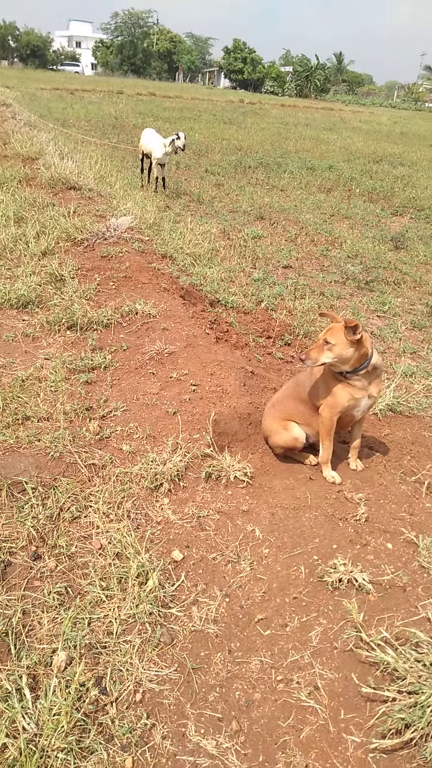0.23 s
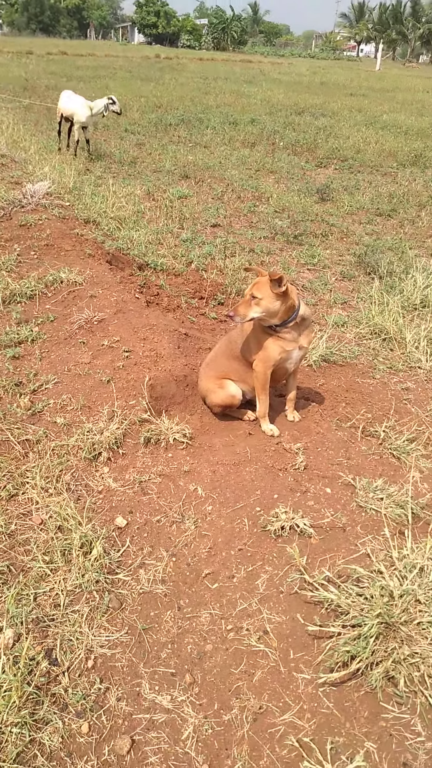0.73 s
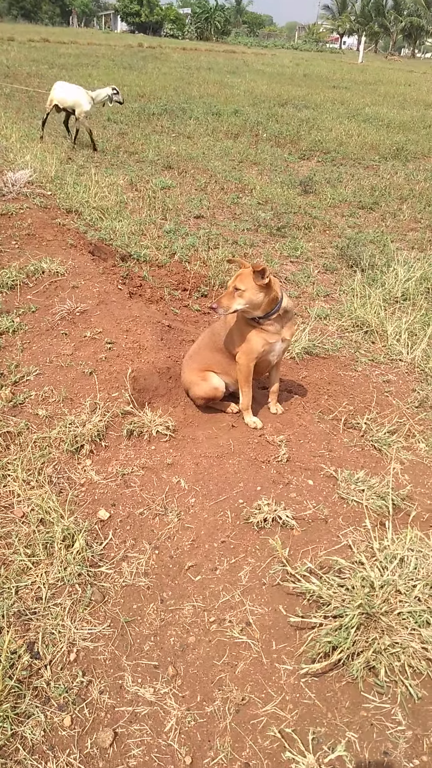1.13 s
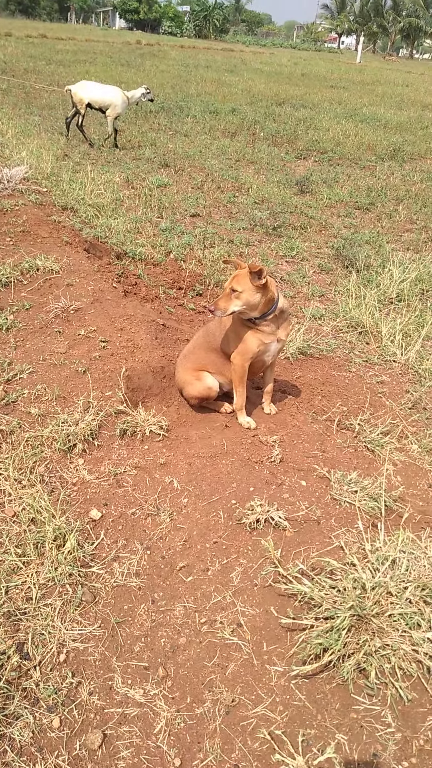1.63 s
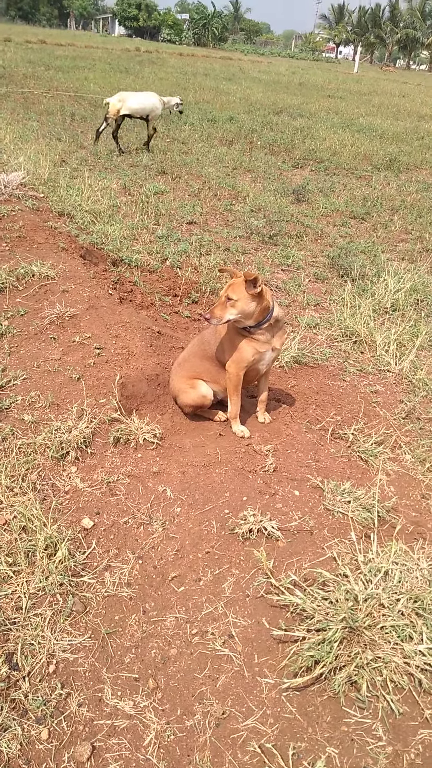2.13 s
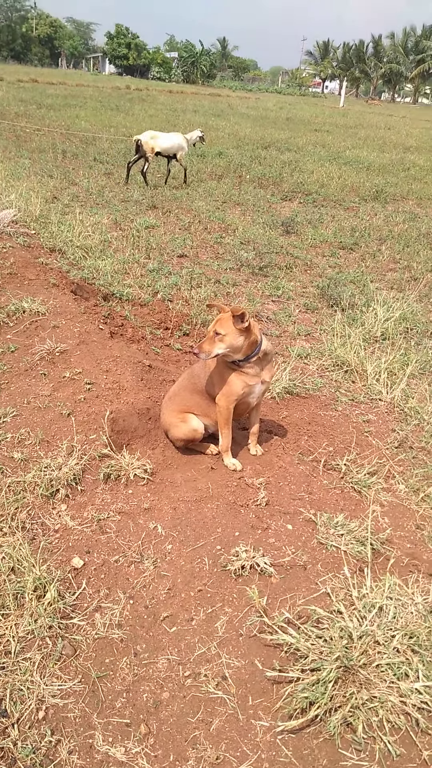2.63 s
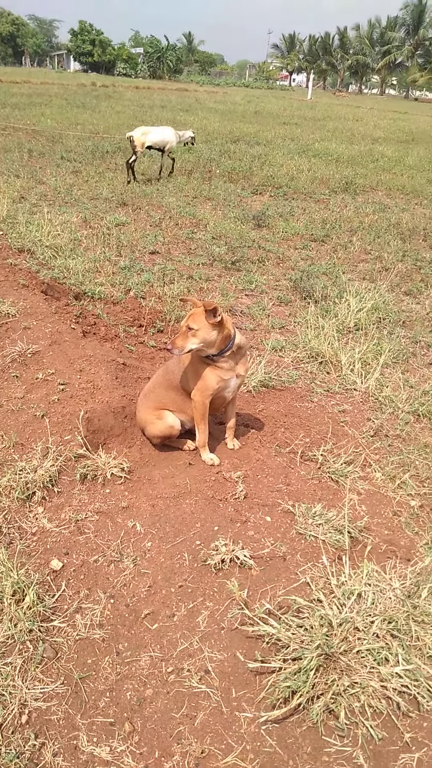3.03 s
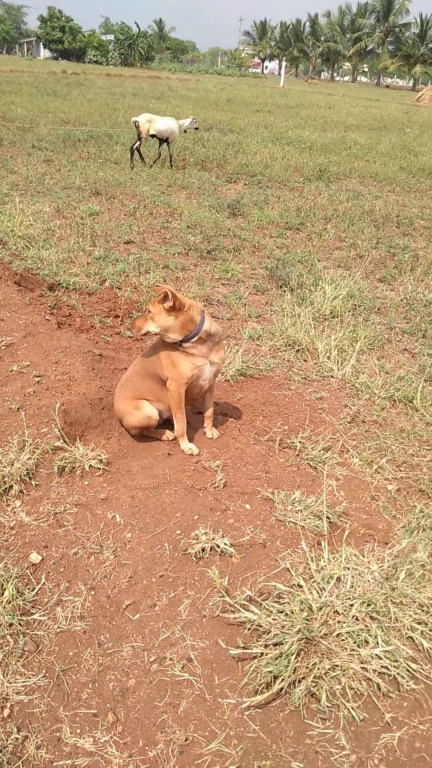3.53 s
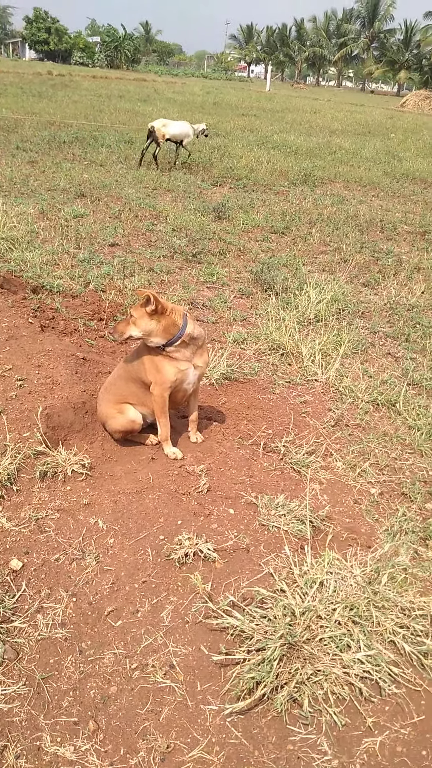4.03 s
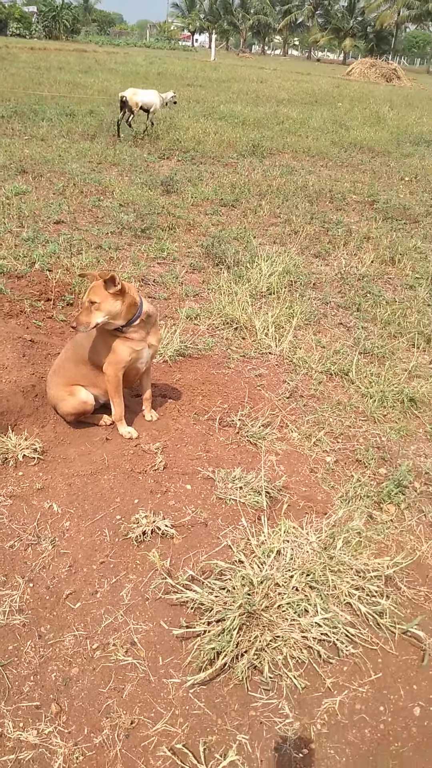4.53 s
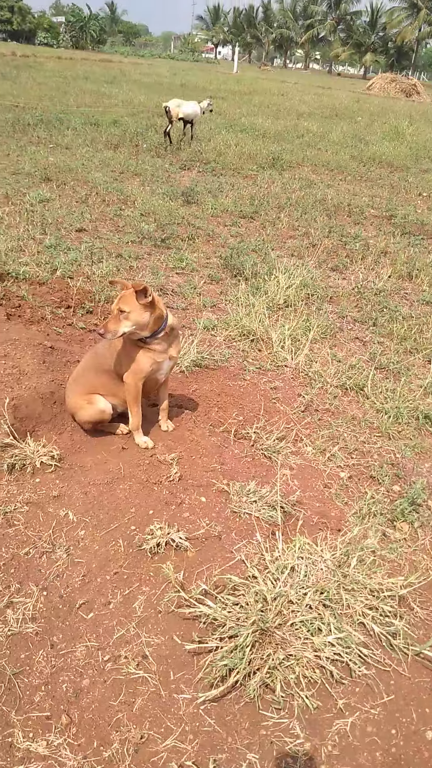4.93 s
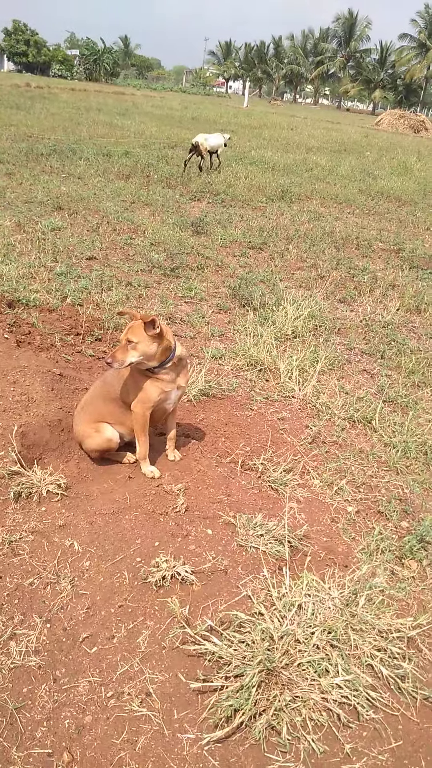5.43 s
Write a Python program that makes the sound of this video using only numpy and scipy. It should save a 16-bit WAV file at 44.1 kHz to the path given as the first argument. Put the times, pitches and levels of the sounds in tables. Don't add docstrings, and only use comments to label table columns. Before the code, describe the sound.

Open farmland in daytime heat: one piercing cicada buzz dominates from start to end, its pitch sagging slowly and jumping up near two and a half seconds. Far traffic swells gently around three seconds while wind hisses in grass and leaves. Faint crickets flicker, and small birds give brief, thin whistles in the trees. Diffuse wide stereo from a small device, thin in the bass, with the dog and goat silent.

```python
import sys
import numpy as np
from scipy import signal
from scipy.fft import rfft, irfft, next_fast_len
from scipy.io import wavfile
from scipy.ndimage import uniform_filter1d

SR = 44100
rng = np.random.default_rng(int(sys.argv[2]) if len(sys.argv) > 2 else 0)


def master_out(mix):
    frames = np.transpose(np.atleast_2d(mix))
    ceiling = np.clip(frames, -1, 1)
    pcm = np.round(ceiling * 32767).astype(np.int16)
    wavfile.write(sys.argv[1], SR, pcm)


def invert_db(level):
    return 10 ** (np.asarray(level, dtype=float) / 20)


N = 251370
TIME_S = np.arange(N) / SR
SIDES = np.array([[1], [-1]])
NEAR_LAG_S, FAR_LAG_S = .00048, .00047


def rms_one(x):
    return x / np.sqrt(np.mean(x ** 2) + 1e-20)


def in_time(rows):
    start_s, *columns = np.transpose(rows)
    return [np.interp(TIME_S, start_s, column) for column in columns]


def at_hz(points, hz):
    points_hz, values = np.transpose(points)
    return np.interp(np.log(hz), np.log(points_hz), values)


def shaped(x, response):
    size = next_fast_len(N + 4096)
    hz = np.maximum(np.arange(size // 2 + 1) * SR / size, 1)
    return irfft(rfft(x, size) * response(hz), size)[..., :N]


def resonance(x, centre_hz, width_hz, power):
    return shaped(x, lambda hz: 1 / (1 + ((hz - centre_hz) / width_hz) ** power))


def coloured(spectrum, channels):
    low_end = (spectrum[0][0] / 2, -90)
    high_end = (spectrum[-1][0] * 2, -90)
    curve = [low_end, *spectrum, high_end]
    noise = rng.standard_normal((channels, N))
    return rms_one(shaped(noise, lambda hz: invert_db(at_hz(curve, hz))))


def drift(rate_hz):
    return rms_one(resonance(rng.standard_normal(N), 0, rate_hz, 2))


def swells(rows):
    return sum(db * np.exp(-((TIME_S - middle_s) / half_s) ** 2) for middle_s, db, half_s in rows)


def after(middle_s, length_s):
    return .5 + .5 * np.tanh((TIME_S - middle_s) / length_s)


def ports(x, lag_s, pan_db, pull=0.047):
    def pair(hz):
        turn = np.pi * hz * lag_s
        turn = turn - pull * np.sin(4 * turn) / 4
        left = np.exp(-1j * turn) * invert_db(pan_db / 2)
        right = -np.exp(1j * turn) * invert_db(-pan_db / 2)
        return np.array([left, right])
    room = 200
    return np.roll(shaped(np.roll(x, room), pair), -room, axis=-1)


def from_both_ends(spectrum, lag_s, far_end_db, around_db, pull):
    lag_wander = .05
    a, b, left, right = coloured(spectrum, channels=4)
    share = .5 + .5 * np.tanh(drift(1.5))
    near_end = share * ports(a, lag_s * (1 - lag_wander), 0, pull)
    near_end = near_end + (1 - share) * ports(a, lag_s * (1 + lag_wander / 2), 0, pull)
    wide = near_end + invert_db(far_end_db) * ports(b, -lag_s, 0, pull)
    return rms_one(wide + invert_db(around_db) * np.array([left, right]))


# pitch_hz, level_db
AIR_SAC = [(5000, -49), (5800, -16), (6400, 6), (7000, 5), (7500, -2.5), (7900, -2), (9000, -40),
           (14000, -43)]
# pitch_hz, level_db
RIB_CRACK = [(7200, -26), (7800, 2), (9000, -1), (9700, -3.5), (10300, -10), (12500, -17)]
# middle_s, swell_db, half_length_s
HIGH_MODE_SWELLS = [
    (.1, 3.3, 0.2),
    (2.2, 2.7, 0.29),
    (4.4, 6.8, 0.36),
    (4.88, 6.3, 0.18),
    (5.4, 7.4, 0.26),
]


def air_sac(raw, snap, kick, effort_db, limp):
    body = shaped(raw, lambda hz: invert_db(at_hz(AIR_SAC, hz)))
    low_mode = resonance(snap * kick, 6200, 400, 4)
    high_mode = resonance(snap * kick, 7420, 260, 4)
    crack = snap * (kick + .34 * rng.standard_normal(N))
    crack = shaped(crack, lambda hz: invert_db(at_hz(RIB_CRACK, hz)) * (hz > 7000))
    low_db = -10.5 - 1.2 * effort_db - 7 * limp
    high_db = -15 + swells(HIGH_MODE_SWELLS)
    crack_db = -30.5 + 29 * limp
    song = rms_one(body) + invert_db(high_db) * rms_one(high_mode)
    return song + invert_db(low_db) * rms_one(low_mode) + invert_db(crack_db) * rms_one(crack)


# start_s, level_db, limp_0_to_1 (one muscle outpulls the other)
SONG = [(0, -52.5, 0.37), (.6, -49.5, 0), (1.25, -47, 0), (1.55, -46, 0.56), (2.1, -47, 0.67),
        (2.4, -49.5, 0.75), (2.7, -45.5, 0.5), (3.0, -46, 0), (3.3, -44, 0), (4.1, -44, 0),
        (4.6, -47, 0.24), (5.0, -46, 0.1), (5.2, -45.5, .15), (5.7, -46.5, 0.32)]
# start_s, pitch_hz, throbs_per_s; the pitch sags, leaps up at 2.45 s, then sags again
PACE = [(0, 7020, 105), (.9, 6960, 103), (1.3, 6930, 107), (1.55, 6900, 115), (2.1, 6850, 114),
        (2.45, 6810, 112), (2.47, 7140, 113), (2.75, 7120, 116.5), (3.2, 7090, 114), (3.9, 7060, 112.5),
        (4.2, 7030, 108), (5.0, 6980, 108), (5.2, 7060, 107), (5.7, 7060, 106)]


def cicada():
    level_db, limp = in_time(SONG)
    pitch_hz, throb_rate = in_time(PACE)
    effort_db = level_db + 46
    click_rate = 444.5 + .7 * (throb_rate - 109)
    clicks = np.cumsum(click_rate) / SR
    throb_turn = 2 * np.pi * np.cumsum(throb_rate) / SR

    index = np.round(clicks).astype(int)
    timing, force, slip = rng.standard_normal((index[-1] + 1, 3))[index].T
    since_ms = (clicks - index) / click_rate * 1000 + .03 * timing

    depth = .5 - .5 * limp
    alternation = np.tanh(1.8 * np.cos(throb_turn / 2))
    strength = np.exp(depth * np.cos(throb_turn) + limp * alternation)
    strength = strength / uniform_filter1d(strength, size=1600) * invert_db(.6 * force)

    sag_hz = 165 * (1 - .7 * limp) * np.sin(throb_turn) + 45 * np.sin(throb_turn / 2)
    phase = 2 * np.pi * np.cumsum(pitch_hz - sag_hz + 20 * drift(20)) / SR
    kick = np.cos(phase + (.45 - .3 * limp) * slip)

    ring = .34 + .02 * effort_db - .08 * limp
    click = np.exp(-.5 * (since_ms / .27) ** 2)
    raw = strength * (1.5 * ring * np.cos(phase) + click * kick)
    snap = strength * np.exp(-.5 * (since_ms / .05) ** 2)
    song = air_sac(raw, snap, kick, effort_db, limp)
    song = song + invert_db(-18) * np.roll(song, round(.0013 * SR))

    pan_db = 1 - 3.5 * after(4.2, .45)
    return invert_db(level_db + 1 + pan_db / 2 * SIDES) * ports(rms_one(song), NEAR_LAG_S, pan_db=.5)


# pitch_hz, level_db (per Hz)
CHORUS = [(5000, -43), (5700, -16), (6100, -3.5), (6600, -5), (7100, -5), (7700, -7.5), (9400, -21),
          (10500, -71)]
# middle_s, swell_db, half_length_s
CHORUS_SWELLS = [
    (.1, 3, .3),
    (2.0, -5, .55),
    (3.6, -2, .7),
    (5.4, 1, .3),
]


def chorus():
    level_db = -49.5 + swells(CHORUS_SWELLS) + 1.2 * drift(.8)
    return invert_db(level_db) * from_both_ends(CHORUS, NEAR_LAG_S, -7, -6, pull=.3)


# pitch_hz, level_db (per Hz)
ROAR = [(300, -0.5), (450, -6.5), (600, -4.5), (900, -1), (1250, -1.5), (1600, -5), (2000, -10),
        (3000, -68)]
# pitch_hz, level_db (per Hz)
HISS = [(1200, -19), (1900, 1), (2400, 5), (3000, -1.5), (4000, -2), (5200, -5.5), (8000, -49),
        (11000, -46), (14000, -27)]
# middle_s, swell_db, half_length_s
PASSES = [
    (.1, 3.5, 0.44),
    (1.1, 2, 0.1),
    (2.85, 6.5, 0.5),
    (3.85, 3, 0.16),
    (5.1, 3.5, 0.46),
]
# middle_s, swell_db, half_length_s
GUSTS = [
    (1.27, 3, 0.038),
    (2.4, 5.5, 0.46),
    (3.0, 5, 0.32),
    (4.6, 1, 0.17),
    (5.1, 5.5, 0.53),
    (5.55, 5, 0.1),
]


def road_and_leaves():
    gust_db = swells(GUSTS)
    scatter_db = 2.8 * gust_db + 5 * drift(8)
    roar_db = -50.5 + swells(PASSES) + .8 * drift(3)
    hiss_db = -57 + gust_db + .9 * drift(12)
    roar = invert_db(roar_db) * from_both_ends(ROAR, -FAR_LAG_S, -5, scatter_db - 36, pull=.75)
    hiss = invert_db(hiss_db) * from_both_ends(HISS, -FAR_LAG_S, -5, scatter_db - 25, pull=.65)
    return roar + hiss


# pitch_hz, level_db (per Hz)
RUMBLE = [(12, -84), (20, -10), (75, -3), (145, -3.5), (198, 0.5), (222, -3), (299, -7), (600, -17.5),
          (780, -22.5), (1320, -120)]
# pitch_hz, likeness_0_to_1
RUMBLE_LIKENESS = [(30, 0.16), (60, 0.011), (140, 0.69), (300, 0.87), (600, 0.78)]
# pitch_hz, width_hz, level_db, change_db (once the nearer engine drops out)
HUM_TONES = [
    (73.36, 5.23, -52, 4.5),
    (100.6, 1.6, -46, -20),
    (141.8, 6.7, -49.5, 1.5),
    (200.1, 2.9, -47.5, 1),
    (215.9, 4.9, -49, -2),
    (176.8, 4.35, -55.5, 0),
    (246.3, 4.08, -57, 4.5),
]


def engines():
    rumble_db = -42.5
    mid, side = coloured(RUMBLE, channels=2)
    mid = invert_db(rumble_db) * mid
    changed = after(2.86, .18)
    for pitch_hz, width_hz, level_db, change_db in HUM_TONES:
        turns = np.cumsum(pitch_hz + width_hz / 2 * drift(2.59)) / SR
        hum_db = level_db + change_db * changed + 2 * drift(3.7)
        mid = mid + invert_db(hum_db) * np.sin(2 * np.pi * turns)
    side = invert_db(rumble_db - 1) * shaped(side, lambda hz: np.sqrt(1 - at_hz(RUMBLE_LIKENESS, hz)))
    return mid + side * SIDES


def whistle(out, middle_s, length_s, start_hz, mid_hz, end_hz, db):
    u = np.linspace(-1, 1, round(length_s * SR))
    bend_hz = (start_hz + end_hz) / 2 - mid_hz
    hz = mid_hz + (end_hz - start_hz) / 2 * u + bend_hz * u ** 2
    first = round((middle_s - length_s / 2) * SR)
    note = np.sqrt(1 - u ** 2) * np.sin(2 * np.pi * np.cumsum(hz) / SR)
    out[first:first + len(u)] += invert_db(db + 13.5) * note


def trees(x):
    length = round(.08 * SR)
    tail = rng.standard_normal(length) * invert_db(np.linspace(0, -30, length))
    x = x * invert_db(3.5 * drift(70))
    return x + invert_db(-7) * signal.fftconvolve(x, tail / np.linalg.norm(tail), axes=-1)[:N]


# middle_s, level_db
HOOK_BIRD = [(.302, -61), (.663, -58), (1.029, -56), (1.393, -54), (3.428, -53), (3.772, -54), (4.114, -54),
             (4.464, -57), (4.815, -56), (5.194, -54), (5.545, -53)]
# offset_s, length_s, start_hz, middle_hz, end_hz, level_db
HOOK_PHRASE = [
    (-.038, .016, 4950, 4700, 4350, -15),
    (-.006, .04, 3820, 3940, 3660, 0),
    (.024, .016, 4100, 4800, 5450, -17),
    (.056, .03, 3850, 3920, 3720, -9),
]
# middle_s, length_s, start_hz, end_hz, level_db
LEFT_CHIRPS = [
    (.48, 0.033, 3620, 3370, -64),
    (1.67, 0.081, 4140, 3480, -68),
    (1.864, 0.085, 3930, 3320, -64.5),
    (2.136, 0.056, 3960, 3470, -71),
    (3.056, 0.079, 4020, 3480, -70),
    (3.165, 0.04, 4700, 4370, -62),
    (4.348, 0.046, 3730, 4140, -62),
    (5.225, .02, 5380, 5220, -65),
    (5.505, 0.077, 4350, 4950, -66),
]
# middle_s, length_s, start_hz, end_hz, level_db
AHEAD_CHIRPS = [
    (.92, .032, 3140, 3060, -64.5),
    (2.085, 0.053, 4100, 4000, -61),
    (2.30, .028, 5450, 5270, -63),
    (2.346, 0.023, 5500, 5280, -64),
    (3.195, .02, 5900, 5350, -52),
    (3.21, .031, 5280, 5420, -57),
    (4.291, 0.057, 3376, 3730, -67),
    (4.425, .022, 3440, 3380, -61.5),
    (4.98, 0.028, 4800, 4300, -51),
    (5.555, 0.041, 4960, 5360, -60),
]


def birds():
    hook, left, ahead = np.zeros((3, N))
    for s, db in HOOK_BIRD:
        for offset_s, length_s, start_hz, mid_hz, end_hz, note_db in HOOK_PHRASE:
            whistle(hook, s + offset_s, length_s, start_hz, mid_hz, end_hz, db + note_db - 6.5)
    for out, chirps in ((left, LEFT_CHIRPS), (ahead, AHEAD_CHIRPS)):
        for s, length_s, start_hz, end_hz, db in chirps:
            whistle(out, s, length_s, start_hz, (start_hz + end_hz) / 2, end_hz, db - 3)
    flock = ports(trees(hook), NEAR_LAG_S, pan_db=-2.5)
    flock = flock + ports(trees(left), -FAR_LAG_S, pan_db=5)
    flock = flock + ports(trees(ahead), -FAR_LAG_S, pan_db=-.5)
    return invert_db(-4.5) * flock


# middle_s, swell_db, half_length_s
CRICKET_SWELLS = [
    (1.7, 2.4, 0.34),
    (2.8, 13, 1),
    (4.8, 7.2, .4),
]


def crickets():
    band = resonance(rng.standard_normal(N), 2320, 90, 2)
    level_db = -72 + swells(CRICKET_SWELLS) + 2.5 * drift(15)
    return invert_db(level_db) * ports(rms_one(band), -FAR_LAG_S, pan_db=1)


def scene():
    return cicada() + chorus() + road_and_leaves() + engines() + birds() + crickets()


# pitch_hz, left_over_right_db
PORT_TILT = [(60, 0), (140, 1.5), (300, 3.2), (600, 1.8), (1200, -1.8), (1900, -.2), (2300, .2), (3000, 1),
             (4200, 0), (6000, -1), (7500, -2.5), (9000, -3.5), (13500, -3.5)]
# pitch_hz, level_db (per Hz)
SELF_NOISE = [(8000, -18), (10000, -5), (11000, 0), (12000, -3), (13500, -4.5), (14500, -7)]


def microphones(x):
    tilted = shaped(x, lambda hz: invert_db(at_hz(PORT_TILT, hz) / 2 * SIDES))
    noisy = tilted + invert_db(-72 + 1.7 * drift(5)) * coloured(SELF_NOISE, channels=2)
    return signal.sosfilt(signal.butter(6, 46, "high", fs=SR, output="sos"), noisy)


def low_pass(x):
    return signal.sosfilt(signal.butter(12, 14140, fs=SR, output="sos"), x)


def record(dry):
    mix = microphones(dry)
    return low_pass(mix)


dry = scene()
out = record(dry)
master_out(out)
```